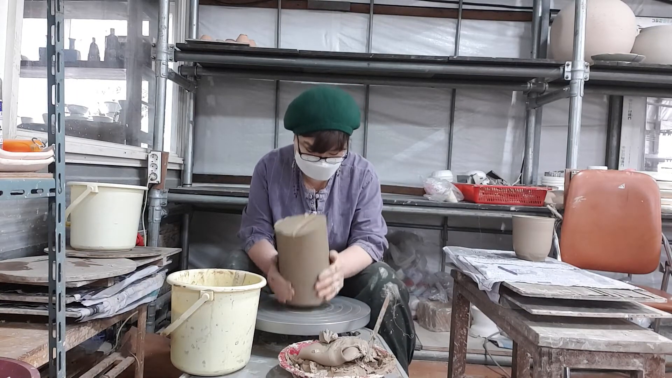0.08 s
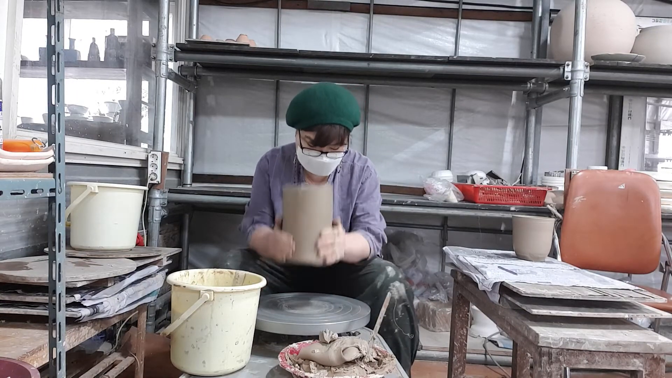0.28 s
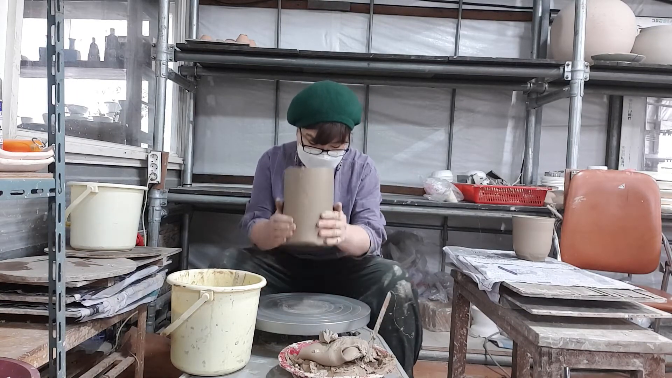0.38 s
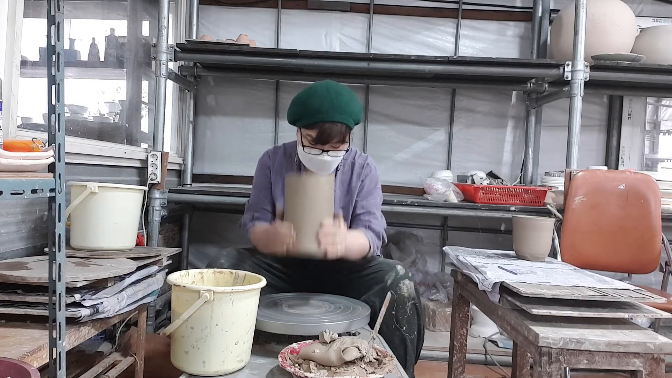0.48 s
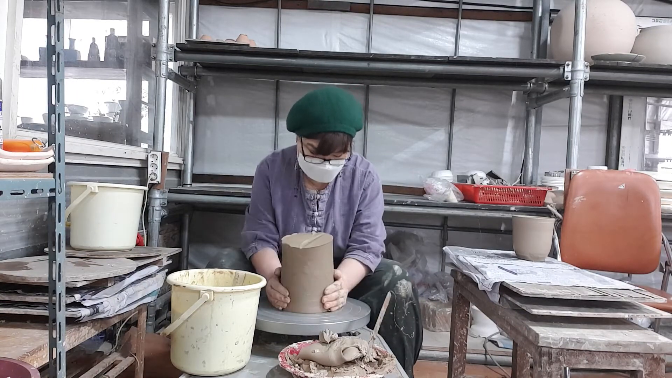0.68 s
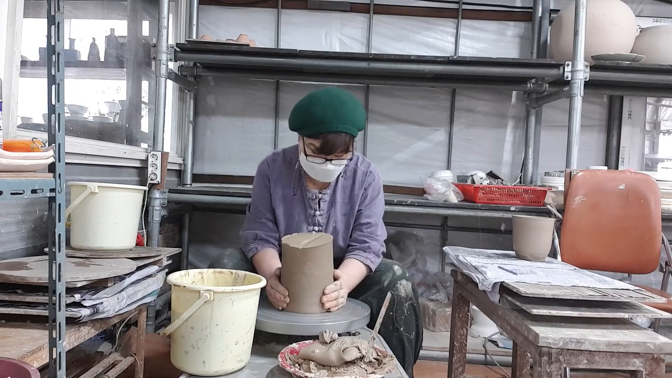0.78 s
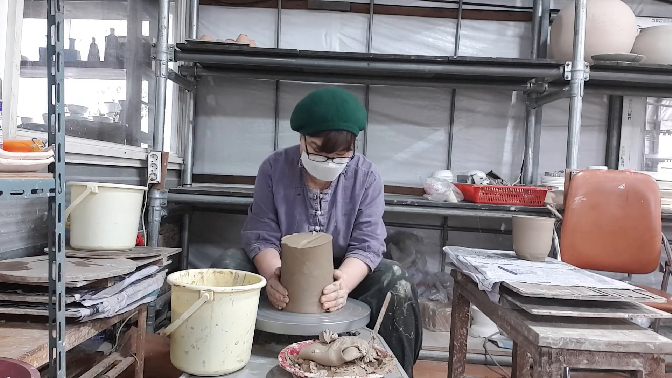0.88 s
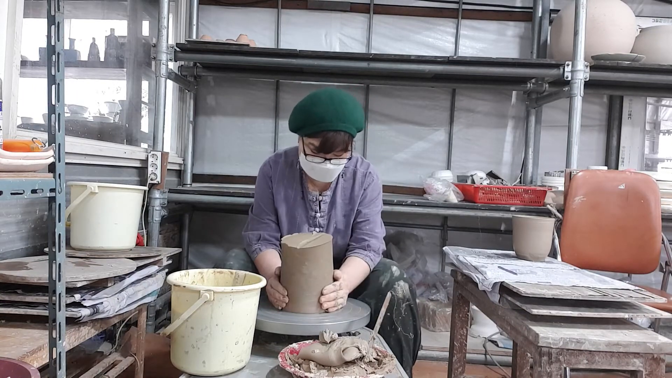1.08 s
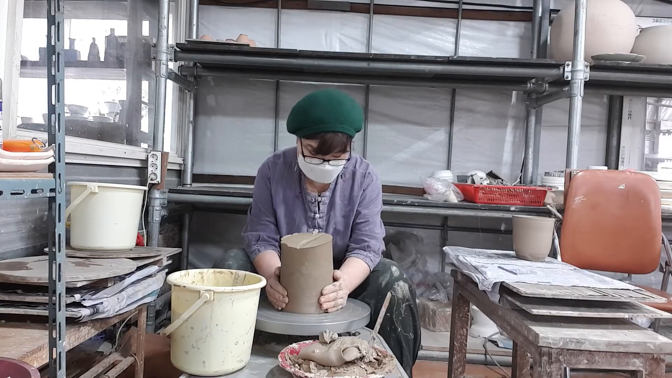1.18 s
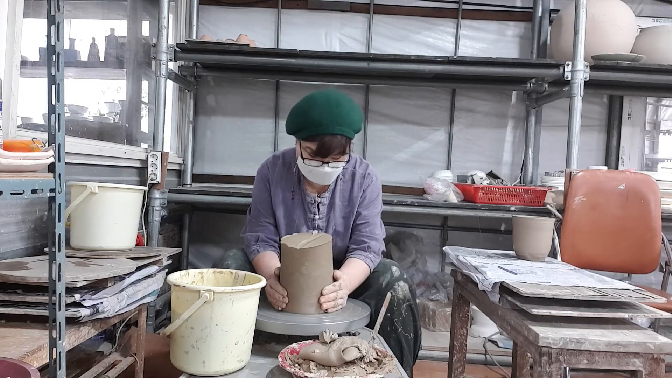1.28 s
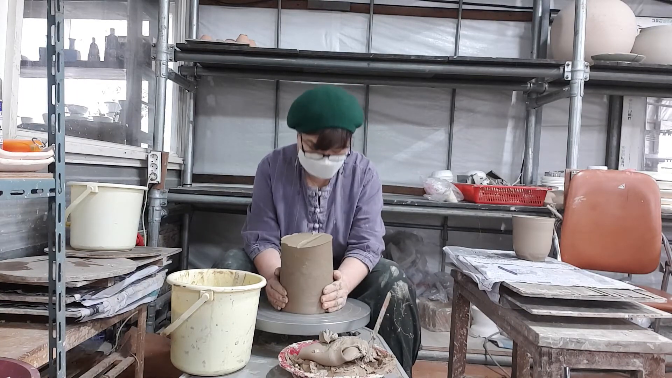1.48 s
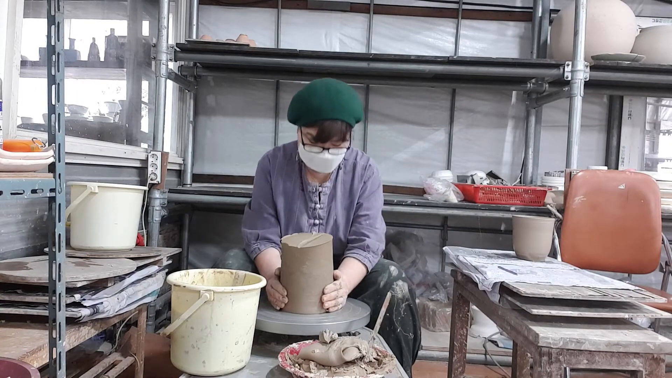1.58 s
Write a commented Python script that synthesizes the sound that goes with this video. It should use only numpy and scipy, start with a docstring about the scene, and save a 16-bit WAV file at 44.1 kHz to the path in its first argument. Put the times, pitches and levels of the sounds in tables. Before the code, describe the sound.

A heavy lump of wet clay slaps hard onto a potter's wheel, over low rumble

```python
"""Pottery workshop: a lump of wet clay is slammed onto a running wheel.
Hands hiss over the clay before the blow, and once more faintly after it (noise bursts).
The slap is a pressure pulse, two noise bursts and damped modes; frame and wheel add a thump and a ring.
Noise tails give a wall echo and the room's answer.
Beneath run the wheel's wavering hum, whirr and rumble (tones, noise) and a soft rush of air (noise)."""
import sys
import numpy as np
from scipy import signal
from scipy.fft import rfft, irfft, next_fast_len
from scipy.io import wavfile
from scipy.ndimage import uniform_filter1d, map_coordinates

SR = 44100
rng = np.random.default_rng(int(sys.argv[2]) if len(sys.argv) > 2 else 0)


def output_pcm(signal):
    """Save a mono or channel-first signal as 16-bit PCM at the path in sys.argv[1].

    Samples are clipped to [-1, 1] before scaling.
    """
    pcm = np.clip(np.atleast_2d(signal).T, -1, 1) * 32767
    wavfile.write(sys.argv[1], SR, np.round(pcm).astype(np.int16))


N = 72765

SLAP_S = 0.6393  # the clay lands

# pressure pulse of the air squeezed out under the clay
CRACK_DB, CRACK_WIDTH_S, CRACK_REBOUND_S = -7, 0.00015, 0.00045
# bright snap as the wet faces meet: (frequency [Hz], level [dB])
SNAP_SPECTRUM = [(1500, -40.5), (4000, -11), (7500, -15), (8800, 0), (10200, -12.5), (12000, -15),
                 (13600, -11.5), (15500, -24)]
SNAP_DB, SNAP_T60_S, SNAP_DELAY_S = -14.5, 0.0073, 0.00034
# wet spreading of the clay: (frequency [Hz], level [dB])
SPLAT_SPECTRUM = [(50, -29), (250, -13), (400, -1), (700, -5), (1000, -3.5), (1300, -30), (1800, 3.5),
                  (2300, -18.5), (3000, -8.5), (4500, -22), (5900, -15.5), (7500, -23), (8800, -10.5),
                  (10500, -20), (15500, -25)]
SPLAT_DB, SPLAT_T60_S, SPLAT_LEAD_S = -15, 0.045, 0.00046
# damped knock of the loaded wheel head: (frequency [Hz], level [dB], T60 [s])
KNOCK_MODES = [(426, -19, 0.056), (461, -16.5, 0.0567), (673, -24, 0.055), (948, -23.5, 0.017),
               (1494, -25, 0.042), (1837, -46, .028), (5770, -32.5, .012)]
KNOCK_RISE_S = 0.00035
# left-right likeness of blow and hands: (frequency [Hz], correlation [-1..1])
SLAP_CORRELATION = [(100, .98), (400, 1), (900, 0.56), (2000, .2), (5000, -0.055), (10000, -0.083)]

# thump of the frame: (frequency [Hz], level [dB], T60 [s])
THUMP_MODES = [(81, -17, 0.11), (106.6, -11.5, 0.15), (132.8, -6, 0.08)]
THUMP_DELAY_S, THUMP_RISE_S = 0.0095, 0.0053
# lasting ring of the wheel: (frequency [Hz], level [dB], T60 [s])
RING_MODES = [(66.33, -37, .4), (133.8, -23, 0.35), (220, -33.5, 0.13), (499.4, -23.5, 0.37),
              (627, -41.5, 0.71), (700, -41.5, 0.22), (842, -44.5, .3), (950, -45, 0.4),
              (1207, -48.5, 0.55), (1539, -46, 0.33), (1793, -43, 0.11), (1850, -47, 0.21),
              (2074, -41.5, .3), (2192, -44, .25), (2804, -43.5, 0.51), (2935, -49.5, .35)]
RING_RISE_S, RING_WAVER_RAD = 0.0047, 0.15

# first echo off a nearby wall: (frequency [Hz], level [dB])
WALL_SPECTRUM = [(500, -27.5), (950, -6.5), (1300, -11.5), (1950, 0), (2600, -16.5), (5000, -33),
                 (15500, -41.5)]
WALL_DELAY_S, WALL_DB, WALL_RISE_S, WALL_T60_S = 0.015, -27, 0.002, 0.029
# the workshop's answer: (frequency [Hz], level [dB], T60 [s])
ROOM_BANDS = [(49.8, -9.5, 0.5), (129.2, 2, 0.299), (281, -8.5, 0.76), (445.8, -4.5, .35),
              (574, -8.5, 0.25), (910, 0, 0.31), (1180, -13, .37), (1900, -2.5, .37), (2450, -16.5, 0.49),
              (2867, -12, .48), (4310, -19.5, 0.6), (6330, -18, 0.6), (8000, -22, .52),
              (8930, -12.5, 0.501), (10200, -18, 0.44), (14000, -25, 0.46), (15800, -34, 0.29)]
ROOM_DB, ROOM_RISE_S = -26.5, 0.004

# hands sliding on the clay: (time [s], level [dB], rise [s], T60 [s])
SWISH_EVENTS = [(.005, -60, .02, 0.32), (.058, -48.5, 0.0094, 0.17), (0.102, -57.5, 0.036, .5),
                (1.025, -68, .006, 0.22)]
# hiss of the hands: (frequency [Hz], level [dB])
SWISH_SPECTRUM = [(2000, -2.5), (4000, -17.5), (6300, -11.5), (7900, -10), (8700, 1), (10000, -1),
                  (11000, -5.5), (15500, -17)]

# hum of the wheel: (time [s], frequency [Hz], level [dB])
HUM_TRACK = [(0, 70.5, -47), (.13, 66.7, -41), (.22, 45.3, -34), (.32, 54.65, -40.5), (.43, 56, -37),
             (.5, 60.3, -54.5), (.62, 66.4, -41.5), (.8, 64.75, -40), (1.0, 64.4, -45.5),
             (1.1, 67.8, -36.5), (1.2, 67.7, -47), (1.3, 67, -35.5), (1.42, 68.08, -44), (1.52, 66.8, -36),
             (1.65, 68.9, -45)]
# whirr of the wheel: (time [s], level [dB])
WHIRR_LEVEL_DB = [(0, -64.5), (.45, -56.5), (.9, -51.5), (1.03, -56.5), (1.15, -47.5), (1.35, -50.5),
                  (1.65, -52.5)]
WHIRR_HZ, WHIRR_DRIFT_HZ = 189.7, 4.3
# bearing rumble: (frequency [Hz], level [dB])
RUMBLE_SPECTRUM = [(20, -27.5), (32, -12.5), (48, 0.5), (90, -3), (120, -5.5), (160, -12), (215, -10),
                   (300, -20), (600, -66.5)]
# bearing rumble: (time [s], level [dB])
RUMBLE_LEVEL_DB = [(0, -39.5), (.25, -40), (.55, -42), (1.0, -41), (1.3, -46), (1.65, -41)]
# left-right likeness of the rumble: (frequency [Hz], correlation [-1..1])
RUMBLE_CORRELATION = [(50, 1), (130, .92), (300, 1), (600, .4)]

# rush of air: (frequency [Hz], level [dB])
AIR_SPECTRUM = [(100, -8), (300, -3.5), (480, -4), (720, -1.5), (890, 2), (1200, -5.5), (1700, -11),
                (2400, -21.5), (2800, -28), (3200, -34.5), (5000, -39.5), (7900, -50.5), (9500, -40),
                (15500, -37.5)]
# rush of air: (time [s], level [dB])
AIR_LEVEL_DB = [(0, -47), (.3, -47.5), (.5, -45), (.9, -48.5), (1.15, -48.5), (1.3, -47), (1.65, -48.5)]
# duller part of the rush: (frequency [Hz], level [dB])
AIR_BODY_SPECTRUM = [(100, -12), (330, 1.5), (520, 0.5), (900, -14), (2500, -45.5)]
# duller part of the rush: (time [s], level [dB])
AIR_BODY_LEVEL_DB = [(0, -63.5), (.3, -51), (.6, -57), (.9, -64), (1.65, -62.5)]
# left-right likeness of the air: (frequency [Hz], correlation [-1..1])
AIR_CORRELATION = [(130, 1), (290, .84), (640, 0.36), (1400, -0.23), (3000, .05), (10000, -0.095)]

# left over right, blow: (frequency [Hz], level difference [dB])
BLOW_BALANCE = [(130, -2.5), (300, -4), (500, -1.5), (1200, -4), (2500, -3), (5000, -3.5), (9000, -4.5),
                (13000, -3)]
# left over right, wheel, air and hands: (frequency [Hz], level difference [dB])
STEADY_SOUND_BALANCE = [(50, -4), (200, -2.5), (900, -3), (3000, -4), (10000, -2.5)]

# noise suppressor on the treble, and upper band limit
GATE_HZ, GATE_THRESHOLD_DB, GATE_DEPTH_DB = 3020, -66, -6
TOP_HZ = 15850


def amp(db):
    """Amplitude factor of a level in dB."""
    return 10 ** (np.asarray(db) / 20)


def unit(x):
    """Scale to rms 1."""
    return x / np.sqrt(np.mean(x ** 2) + 1e-20)


def along(points, hz):
    """Interpolate (frequency [Hz], value) points on a log axis."""
    f, v = np.transpose(points)
    return np.interp(np.log(hz + 1), np.log(f + 1), v)


def clock():
    """Time of each sample [s]."""
    return np.arange(N) / SR


def curves(rows):
    """One value per sample for each column after the time."""
    s, *columns = np.transpose(rows)
    return [np.interp(clock(), s, column) for column in columns]


def wobble(rate_hz):
    """Smooth random curve with rate_hz knots a second."""
    knots = rng.standard_normal(256)
    return map_coordinates(knots, [clock() * rate_hz], mode="wrap")


def filtered(x, response):
    """Apply a gain that depends on frequency, with mirrored ends."""
    pad = N // 4
    head, tail = x[..., pad:0:-1], x[..., -2:-pad - 2:-1]
    x = np.concatenate([head, x, tail], axis=-1)
    size = next_fast_len(x.shape[-1])
    spectrum = rfft(x, size) * response(np.fft.rfftfreq(size, 1 / SR))
    return irfft(spectrum, size)[..., pad:pad + N]


def noise(spectrum, correlation):
    """Coloured stereo noise of rms 1; the mid-side mix sets the correlation."""
    def mid_side_gain(hz):
        angle = np.arccos(np.clip(along(correlation, hz), -1, 1)) / 2
        return amp(along(spectrum, hz)) * np.array([np.cos(angle), np.sin(angle)])

    mid, side = filtered(rng.standard_normal((2, N)), mid_side_gain)
    return unit(np.array([mid + side, mid - side]))


def fade(t, t60_s):
    """Free decay from t = 0, 60 dB per t60_s."""
    return amp(-60 * np.maximum(t, 0) / t60_s)


def swell(t, rise_s):
    """Soft exponential start from t = 0."""
    return 1 - np.exp(-np.maximum(t, 0) / rise_s)


def burst(t, rise_s, t60_s):
    """Exponential growth up to t = 0, then free decay."""
    return np.exp(np.minimum(t, 0) / rise_s) * fade(t, t60_s)


def pan(x, balance):
    """Split the balance equally: half up on the left, half down on the right."""
    halves = np.array([[0.5], [-0.5]])
    return filtered(x, lambda hz: amp(along(balance, hz) * halves))


def slap():
    """The clay lands: air pulse and rebound, snap, wet splat, damped knock of the wheel head."""
    t = clock() - SLAP_S

    def pulse(width_s):
        return np.exp(-(t / width_s - 1) ** 2) / width_s

    # the slower rebound has equal area and opposite sign
    crack = amp(CRACK_DB) * CRACK_WIDTH_S * (pulse(CRACK_WIDTH_S) - pulse(CRACK_REBOUND_S))
    snap_envelope = burst(t - SNAP_DELAY_S, CRACK_REBOUND_S, SNAP_T60_S)
    snap = amp(SNAP_DB) * noise(SNAP_SPECTRUM, SLAP_CORRELATION) * snap_envelope
    splat_envelope = burst(t, SPLAT_LEAD_S, SPLAT_T60_S)
    splat = amp(SPLAT_DB) * noise(SPLAT_SPECTRUM, SLAP_CORRELATION) * splat_envelope
    knock = sum(amp(db) * np.cos(2 * np.pi * hz * t) * fade(t, t60_s)
                for hz, db, t60_s in KNOCK_MODES)
    return crack + snap + splat + knock * swell(t, KNOCK_RISE_S)


def wheel_struck():
    """The weight sinks into the frame, whose low modes thump, while the wheel's modes ring on."""
    t = clock() - SLAP_S
    t_thump = t - THUMP_DELAY_S
    thump = sum(amp(db) * np.sin(2 * np.pi * hz * t_thump) * fade(t_thump, t60_s)
                for hz, db, t60_s in THUMP_MODES)
    # each mode's phase wavers on its own
    ring = sum(amp(db) * np.sin(2 * np.pi * hz * t + RING_WAVER_RAD * wobble(40)) * fade(t, t60_s)
               for hz, db, t60_s in RING_MODES)
    return thump * swell(t_thump, THUMP_RISE_S) + ring * swell(t, RING_RISE_S)


def wall():
    """One early, scattered echo of the slap, as a delayed noise burst."""
    envelope = burst(clock() - SLAP_S - WALL_DELAY_S, WALL_RISE_S, WALL_T60_S)
    return amp(WALL_DB) * noise(WALL_SPECTRUM, SLAP_CORRELATION) * envelope


def workshop():
    """Diffuse echo of the slap: noise in which each frequency dies at its own speed."""
    bands = np.array(ROOM_BANDS)
    hz, s, cells = signal.stft(noise(bands[:, :2], SLAP_CORRELATION), SR, nperseg=256)
    t60_s = along(bands[:, ::2], hz)[:, None]
    _, tail = signal.istft(cells * fade(s - SLAP_S, t60_s), SR, nperseg=256)
    return amp(ROOM_DB) * tail[:, :N] * swell(clock() - SLAP_S, ROOM_RISE_S)


def hands():
    """Thin hiss of palms slipping over wet clay: noise bursts added in power."""
    power = sum((amp(db) * burst(clock() - s, rise_s, t60_s)) ** 2
                for s, db, rise_s, t60_s in SWISH_EVENTS)
    return np.sqrt(power) * noise(SWISH_SPECTRUM, SLAP_CORRELATION)


def wheel_running():
    """Rotation gives a wavering low hum and a faint drifting whirr; bearings rumble as noise."""
    def tone(hz):
        return np.sqrt(2) * np.sin(2 * np.pi * np.cumsum(hz) / SR)  # rms 1

    hum_hz, hum_db = curves(HUM_TRACK)
    hum = amp(hum_db + wobble(13.54)) * tone(hum_hz)
    whirr_db = curves(WHIRR_LEVEL_DB)[0] + 1.8 * wobble(5.3)
    whirr = amp(whirr_db) * tone(WHIRR_HZ + WHIRR_DRIFT_HZ * wobble(20))
    rumble = amp(curves(RUMBLE_LEVEL_DB)[0]) * noise(RUMBLE_SPECTRUM, RUMBLE_CORRELATION)
    return hum + whirr + rumble


def air():
    """Soft rush of broadband noise, its duller part fuller before the clay lands."""
    rush_db = curves(AIR_LEVEL_DB)[0] + 0.59 * wobble(9.2)
    rush = amp(rush_db) * noise(AIR_SPECTRUM, AIR_CORRELATION)
    body = amp(curves(AIR_BODY_LEVEL_DB)[0]) * noise(AIR_BODY_SPECTRUM, AIR_CORRELATION)
    return rush + body


def scene():
    """The blow and its echoes over the hands, the running wheel and the air."""
    blow = slap() + wheel_struck() + wall() + workshop()
    steady = hands() + wheel_running() + air()
    return pan(blow, BLOW_BALANCE) + pan(steady, STEADY_SOUND_BALANCE)


def record(dry):
    """A noise suppressor turns quiet treble down; a steep low-pass sets the band limit."""
    treble = filtered(dry, lambda hz: 1 - 1 / (1 + (hz / GATE_HZ) ** 16))
    # power over 700 samples, about 16 ms
    power = np.abs(uniform_filter1d(np.mean(treble ** 2, axis=0), size=700))
    shut = 1 / (1 + (power / amp(GATE_THRESHOLD_DB) ** 2) ** 2)  # 0 open, 1 shut
    gated = dry + treble * (amp(GATE_DEPTH_DB * shut) - 1)
    soft_end = swell(N / SR - clock(), 0.001)
    return filtered(gated * soft_end, lambda hz: 1 / (1 + (hz / TOP_HZ) ** 200))


dry = scene()
out = record(dry)
output_pcm(out)
```